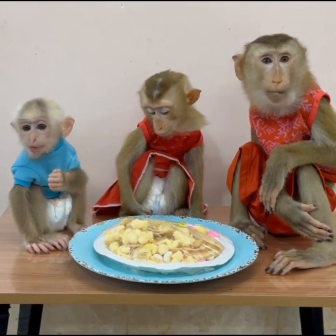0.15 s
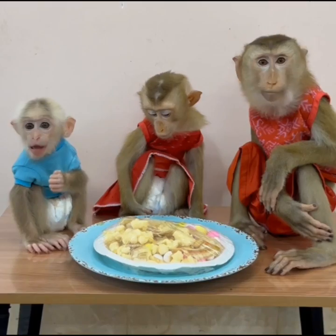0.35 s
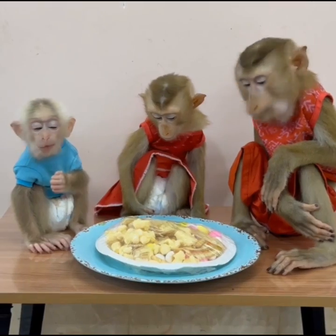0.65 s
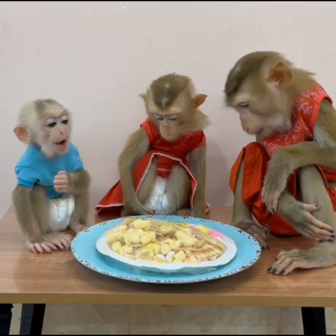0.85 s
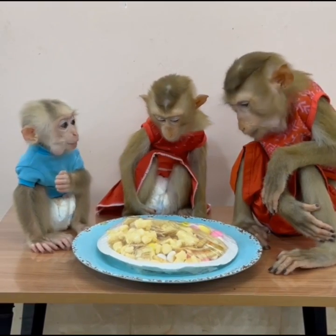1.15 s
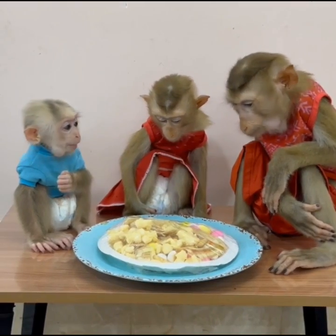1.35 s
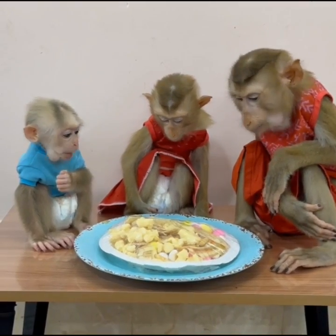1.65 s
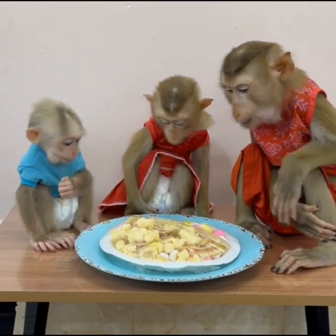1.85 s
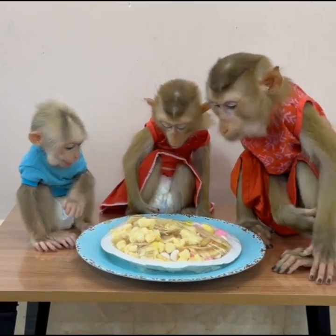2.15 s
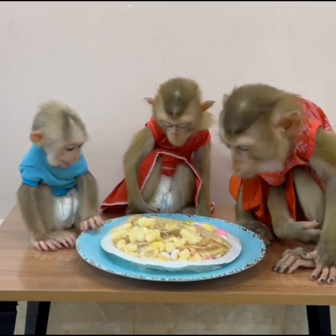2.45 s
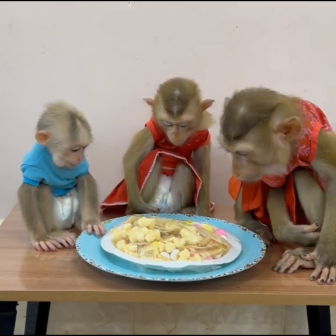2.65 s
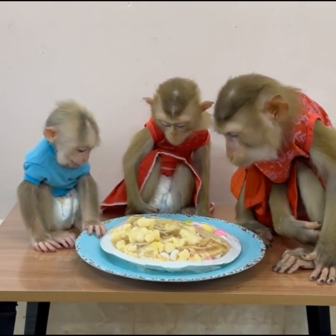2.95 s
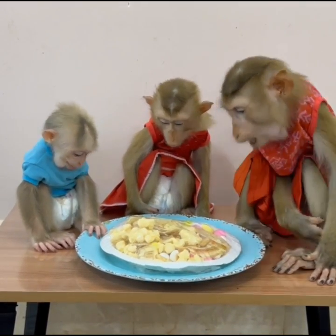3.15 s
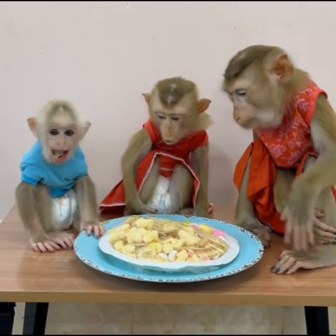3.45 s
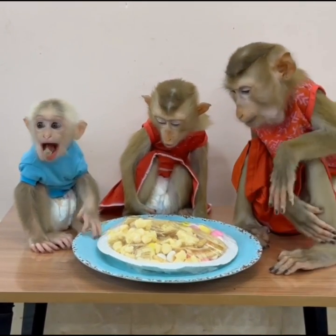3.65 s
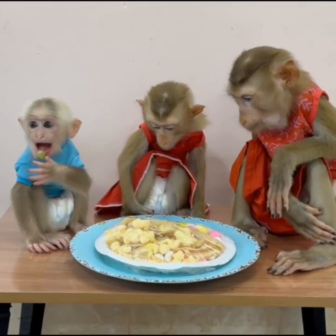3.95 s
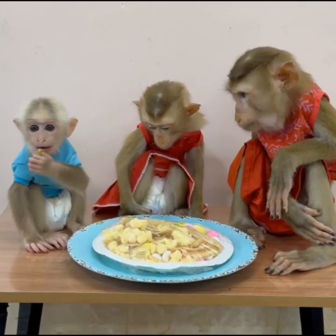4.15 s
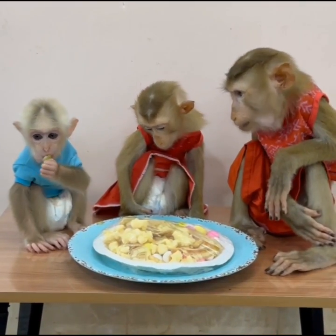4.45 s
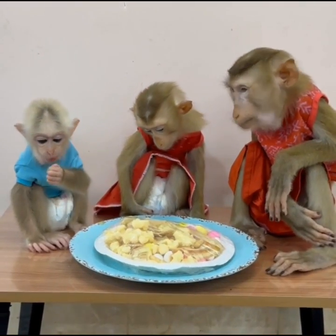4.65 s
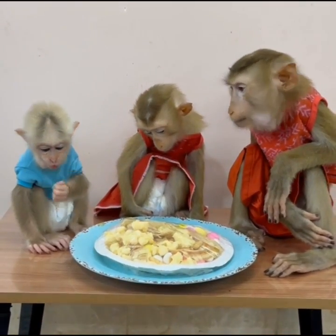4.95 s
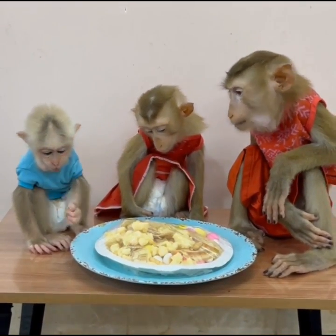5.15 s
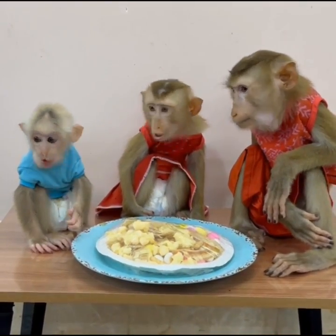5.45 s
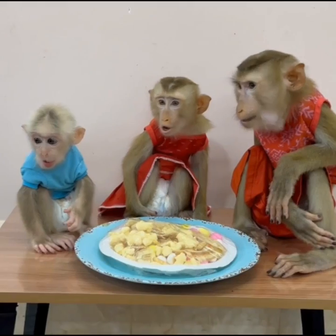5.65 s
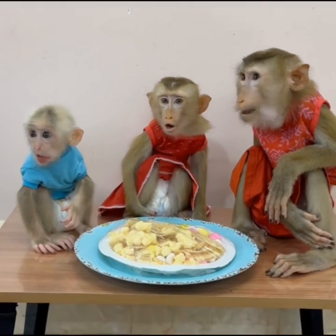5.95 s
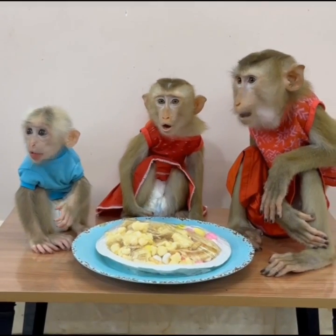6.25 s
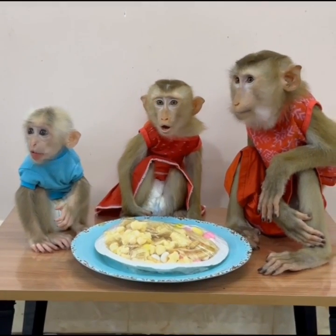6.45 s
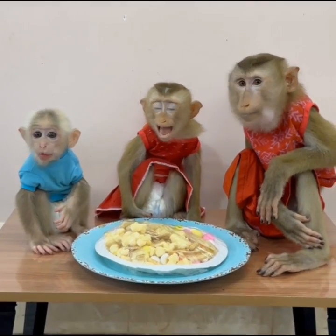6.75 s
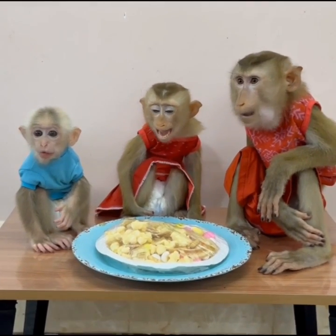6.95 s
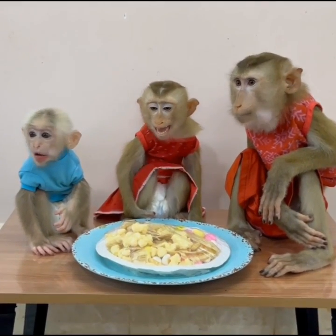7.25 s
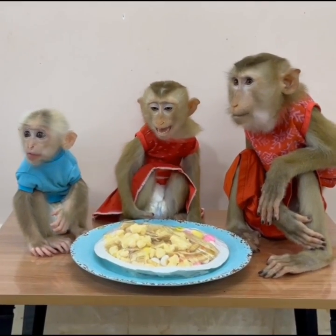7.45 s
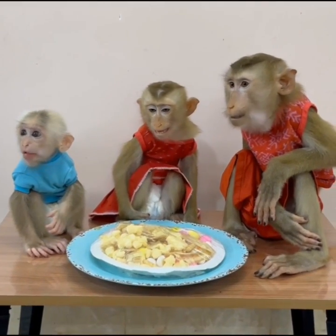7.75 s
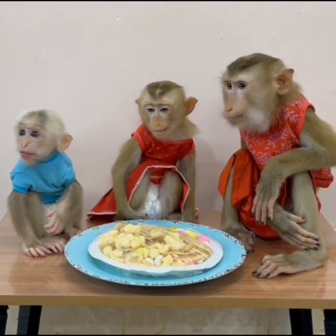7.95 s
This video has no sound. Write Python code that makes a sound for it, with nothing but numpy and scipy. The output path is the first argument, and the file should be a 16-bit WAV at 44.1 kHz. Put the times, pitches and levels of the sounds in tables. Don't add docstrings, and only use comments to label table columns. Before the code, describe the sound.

Small monkeys call at a table about a metre from a stereo phone microphone in a hard-walled room. A soft arched coo comes first, then dry scuffs, a hoarse wheezy chuckle and a rising whoop with a low thump. Two coos and two tiny high squeaks follow, then soft pats and three shakier coos. A yelp cracks into short, piercing, raspy screams with a small grunt. Quiet fan rumble, hum and hiss continue beneath.

```python
import sys
import numpy as np
from scipy import signal
from scipy.fft import rfft, irfft, next_fast_len
from scipy.io import wavfile
from scipy.ndimage import uniform_filter1d

SR = 44100
rng = np.random.default_rng(int(sys.argv[2]) if len(sys.argv) > 2 else 0)


def master_out(mix):
    frames = np.transpose(np.atleast_2d(mix))
    ceiling = np.clip(frames, -1, 1)
    pcm = np.round(ceiling * 32767).astype(np.int16)
    wavfile.write(sys.argv[1], SR, pcm)


def makeup_ratio(level_db):
    decades = np.asarray(level_db, float) / 20
    return 10 ** decades


N = 357651

# frequency in Hz, level in dB per Hz.
RASP = [(1000, -38.5), (1500, -7.5), (2100, -5), (3400, -2), (4100, -7.5), (5000, -4), (6600, -8),
        (8400, -2), (10500, 0), (11300, -14.5), (12200, -41)]
# frequency in Hz, level in dB.
FLAT = [(1000, 0), (12000, 0)]


def along(points, hz):
    f, v = np.transpose(points)
    return np.interp(np.log(np.maximum(hz, 1)), np.log(f), v)


def colour(x, points):
    size = next_fast_len(len(x), True)
    gain = makeup_ratio(along(points, np.fft.rfftfreq(size, 1 / SR)))
    return irfft(rfft(x, size) * gain, size)[:len(x)]


def unit(x):
    return x / np.sqrt(np.mean(x ** 2))


def noise(size):
    return rng.standard_normal(size // SR * SR + SR)


def wobble(size, rate):
    k = max(int(SR / rate), 2)
    smooth = uniform_filter1d(uniform_filter1d(noise(size), k), k)
    return unit(smooth)[:size]


def add(out, t, x):
    i = int(t * SR)
    out[i:i + len(x)] += x[:N - i]


def air():
    # frequency in Hz, level in dB per Hz.
    air_colour = [(25, -19), (40, -8), (55, 1), (100, 0), (160, -5.5), (500, -13.5), (2000, -19),
                  (3200, -30.5), (5000, -32), (8000, -34), (10500, -35.5), (12000, -62.5)]
    shared, differing = (unit(colour(rng.standard_normal(N), air_colour)) * makeup_ratio(-50) for _ in range(2))
    low = colour(shared, [(150, 8), (400, -18.5)])
    throb = low * (makeup_ratio(1.2 * wobble(N, 6)) - 1)
    hum_hz = 98.6 + 2.0 * wobble(N, 4.3)
    hum = makeup_ratio(-56.5 + 5.8 * wobble(N, 15)) * np.sin(2 * np.pi * np.cumsum(hum_hz) / SR)
    differing = colour(differing, [(30, -8), (120, -11), (330, -5), (700, -2), (1500, 2)])
    return shared + throb + hum, differing


def voice(rows, tract, jitter, shimmer_db, edge_s, fall=0., rasp_colour=RASP):
    s, hz, db, bright, *rasp = np.transpose(rows)
    t = np.arange(s[0], s[-1], 1 / SR)
    hz, db, bright = (np.interp(t, s, c) for c in (hz, db, bright))
    hz = hz * (1 + jitter * wobble(len(t), 220))
    slack = fall * np.clip(1 - (s[-1] - t) / .04, 0, 1) ** 2
    hz = hz * (1 - slack)
    bright = bright - 80.0 * slack
    turn = 2 * np.pi * np.cumsum(hz) / SR
    x = np.zeros(len(t))
    for k in range(1, 19):
        throat_db = along(tract, k * hz) - along(tract, hz)
        gain_db = db + throat_db + bright * np.log2(k) + shimmer_db * wobble(len(t), 39.1)
        tone = np.sin(k * turn + rng.uniform(0, 2 * np.pi))
        x += np.sqrt(2) * makeup_ratio(gain_db) * (k * hz < 12500) * tone
    if rasp:
        hiss = unit(colour(noise(len(t))[:len(t)], rasp_colour))
        x += makeup_ratio(np.interp(t, s, rasp[0])) * hiss * makeup_ratio(1.7 * wobble(len(t), 300))
    edges = np.clip(np.minimum(t - s[0], s[-1] - t) / edge_s, 0, 1)
    out = np.zeros(N)
    add(out, s[0], x * edges)
    return out


def coo(curve, db, loudest_s, bright):
    s, hz = np.transpose(curve)
    t = np.linspace(0, s[-1] - s[0], num=120)
    hz = uniform_filter1d(np.interp(t, s - s[0], hz), size=7, mode="nearest")
    catch_db = -25 * np.exp(-t / 0.0027)
    swell = np.clip(1 - t / loudest_s, 0, 1)
    fade = np.clip((t - loudest_s) / (t[-1] - loudest_s), 0, 1)
    db = db + catch_db - 8 * swell - 10 * fade ** 3.24
    bright = bright - 9.6 * np.exp(-t / 0.017)
    return np.transpose([s[0] + t, hz, db, bright])


def coos():
    # time in seconds, pitch in Hz.
    arches = [
        [(0.135, 670), (0.203, 718), (0.27, 764.3), (0.369, 759.5), (0.457, 716), (0.49, 669)],
        [(3.13, 774.5), (3.18, 816), (3.342, 828.6), (3.385, 810), (3.415, 782), (3.46, 760)],
        [(3.615, 669), (3.661, 803), (3.685, 795.7), (3.715, 775.6), (3.79, 769.2), (3.82, 724)],
        [(5.15, 802), (5.225, 753), (5.28, 797.5), (5.385, 809.4), (5.43, 788), (5.55, 756)],
        [(5.71, 680), (5.752, 747), (5.83, 753), (5.86, 773.6), (5.895, 762), (5.95, 718)],
        [(6.125, 685), (6.17, 716), (6.225, 769), (6.29, 773.6), (6.35, 732), (6.39, 723)],
    ]
    # level of the lowest tone in dB, loudest after seconds,
    # brightness in dB per octave.
    breaths = [
        (-33, .13, .8),
        (-28.5, .05, 1),
        (-31.5, .05, 3.3),
        (-29.5, .24, .8),
        (-34.5, .07, 3.6),
        (-35.5, .08, 4),
    ]
    # frequency in Hz, level in dB.
    young_throat = [(300, -29), (800, 5.5), (1550, -17), (2400, -12), (3100, -18.5), (3900, -27.5),
                    (5000, -42.5), (6000, -18.5), (6700, -29.5), (8100, -24), (9500, -47), (12000, -40.5)]
    older_throat = [(300, -36), (800, 9), (1550, -10), (2400, -7.5), (3100, -18), (3900, -26), (5000, -38),
                    (6000, -17), (7100, -31.5), (8100, -21), (9500, -57), (12000, -44)]
    notes = [coo(arch, *breath) for arch, breath in zip(arches, breaths)]
    out = np.zeros(N)
    for note in notes[:3]:
        out += voice(note, young_throat, jitter=0.0012, shimmer_db=1.0, edge_s=0.01, fall=0.19)
    for note in notes[3:]:
        out += voice(note, older_throat, jitter=0.004, shimmer_db=3.0, edge_s=0.0026, fall=.13)
    return out


def scuffs():
    # start in seconds, peak level in dB.
    scuff_times = [(1.3515, -51), (1.6006, -46.5), (2.6384, -62), (2.7028, -38), (2.7341, -46),
                   (2.878, -55.5), (3.028, -58)]
    out, t = np.zeros(N), np.arange(4000) / SR
    for s, db in scuff_times:
        grit = colour(rng.standard_normal(len(t)), [(800, -6.5), (3000, 0), (9000, -3.0)])
        add(out, s, makeup_ratio(db - 5.0) * unit(grit) * np.minimum(t / 0.0028, 1) * np.exp(-t / 0.023))
    return out


def chuckle():
    # frequency in Hz, width in Hz, level in dB.
    resonances = [(1400, 230, 4.5), (2490, 374, -3.5), (3270, 500, -18)]
    t = np.arange(0, .215, 1 / SR)
    db = -48.5 + 4 * np.exp(-((t - 0.048) / 0.021) ** 2)
    slaps = noise(len(t))[:len(t)] * makeup_ratio(1.8 * wobble(len(t), 70))
    x = np.zeros(len(t))
    for hz, width, gain_db in resonances:
        ring = signal.filtfilt(*signal.iirpeak(hz, hz / width, SR), slaps)
        x += makeup_ratio(gain_db) * ring * np.sqrt(250 / width)
    out = np.zeros(N)
    add(out, 1.585, unit(x) * makeup_ratio(db) * np.minimum((t[-1] - t) / .02, 1))
    return out


def whoops():
    # time in seconds, pitch in Hz, level of the lowest tone in dB, brightness in dB per octave.
    whoop, yelp = [
        [(1.765, 727, -42, 2), (1.781, 756.5, -38, 7), (1.837, 853, -28.5, 6.5), (1.909, 907, -28, 9),
         (1.997, 997, -25.5, 7), (2.053, 1104, -36, 10), (2.097, 1427, -30.5, -8), (2.11, 1500, -27, -38)],
        [(6.635, 760, -50, 1), (6.643, 791, -39, 2), (6.671, 870, -33.5, 2.5), (6.701, 957, -39, 11),
         (6.73, 914, -41.5, 5)],
    ]
    # frequency in Hz, level in dB.
    whoop_throat = [(300, 18), (900, 18), (1400, -22.5), (1900, -20), (2800, -23.5), (3700, -28.5),
                    (5000, -48), (6500, -37.5), (8500, -49), (10500, -43), (12000, -54.5)]
    yelp_throat = [(900, 3), (1800, -6), (2800, -18), (3700, -20), (5000, -39), (6200, -28.5),
                   (8300, -37.5), (10000, -52), (12000, -57)]
    out = voice(whoop, whoop_throat, jitter=0.0017, shimmer_db=5.0, edge_s=0.0072)
    return out + voice(yelp, yelp_throat, jitter=0.0029, shimmer_db=6.0, edge_s=0.0026)


def pats():
    # start in seconds, peak level in dB, table pitch in Hz.
    pat_times = [(1.929, -33, 56.5), (4.704, -41, 83.4), (4.865, -48, 99.6), (4.996, -35, 83.4),
                 (5.02, -57, 83.4)]
    out, t = np.zeros(N), np.arange(4000) / SR
    for s, db, hz in pat_times:
        add(out, s, makeup_ratio(db) * np.sin(2 * np.pi * hz * t) * np.exp(-t / 0.015))
    return out


def shrill(curve, break_s, rasp_db, growth_db_s, bright):
    s, hz, db = np.transpose(curve)
    t = np.linspace(s[0], s[-1], num=120)
    hz, db = np.interp(t, s, hz), np.interp(t, s, db)
    growth = growth_db_s * np.maximum(break_s - t, 0)
    dying = 1102 * np.maximum(t - break_s, 0)
    bright = bright - 0.32 * (db + 15)
    return np.transpose([t, hz, db, bright, rasp_db - growth - dying])


def squeaks():
    # time in seconds, pitch in Hz, level of the lowest tone in dB.
    squeak_curves = [
        [(3.645, 4900, -43), (3.65, 5576, -24.5), (3.665, 5510, -25), (3.682, 5500, -47)],
        [(3.996, 4800, -57), (4.0, 5168, -30.5), (4.026, 5227, -31.5), (4.038, 4990, -19.5), (4.06, 4580, -31)],
    ]
    # time of the click in seconds, its
    # level in dB, rise towards it in dB per second, brightness in dB per octave.
    squeak_breaks = [(3.648, -48, 97, -23.5), (3.996, -49, 111, -18)]
    return sum(voice(shrill(curve, *snap), FLAT, jitter=0.00073, shimmer_db=-2.5, edge_s=0.0038)
               for curve, snap in zip(squeak_curves, squeak_breaks))


def voice_crack():
    # time in seconds, pitch in Hz, level of the lowest tone in dB.
    crack_curve = [(6.7, 3000, -44), (6.728, 1550, -40), (6.752, 2250, -40), (6.785, 1700, -49)]
    # frequency in Hz, rasp level in dB per Hz.
    crack_rasp = [(1000, -35), (1600, 6), (2300, -2.5), (3200, -19), (5000, -10.5), (6500, -12.5),
                  (8200, -3), (10000, -10.5), (12000, -15)]
    rows = shrill(crack_curve, break_s=6.752, rasp_db=-28, growth_db_s=350, bright=-19)
    return voice(rows, FLAT, jitter=.07, shimmer_db=4.0, edge_s=.004, rasp_colour=crack_rasp)


def screams():
    # time in seconds, pitch in Hz, level of the lowest tone in dB.
    scream_curves = [
        [(6.78, 2120, -41), (6.8, 4000, -46.5), (6.815, 3800, -48), (6.83, 3294, -20), (6.842, 3600, -32),
         (6.849, 3160, -9.5), (6.862, 2050, -38)],
        [(7.072, 2850, -25), (7.076, 3278, -4), (7.081, 3734, -19), (7.098, 3250, -18), (7.115, 3350, -52),
         (7.135, 3600, -25), (7.155, 3500, -27), (7.168, 3100, -9), (7.185, 1900, -36)],
        [(7.387, 3043, -45), (7.392, 2917, -30.5), (7.409, 2720, -30.5), (7.414, 2814, -39)],
        [(7.412, 3900, -34), (7.417, 3600, -20), (7.423, 3300, -36)],
    ]
    # time in seconds, rasp level in dB,
    # rasp growth in dB per second, brightness in dB per octave.
    scream_breaks = [(6.849, -21, 298, -11.5), (7.175, -20, 620, -4), (7.416, -10, 1517, 4.5),
                     (7.415, -17, 3500, -3.5)]
    # frequency in Hz, level in dB.
    open_mouth = [(1200, 0), (3300, 6.5), (5000, -1), (6800, 2), (8300, 3), (10000, -0.5), (12000, -12)]
    return sum(voice(shrill(curve, *tear), open_mouth, jitter=0.019, shimmer_db=-0.5, edge_s=0.00018)
               for curve, tear in zip(scream_curves, scream_breaks))


def grunt():
    # time in seconds, pitch in Hz.
    grunt_pitch = [(7.34, 516), (7.426, 427), (7.46, 411), (7.5, 337)]
    # frequency in Hz, level in dB.
    grunt_throat = [(300, 12.5), (480, -1.5), (850, 1), (1200, -39), (3000, -62)]
    rows = coo(grunt_pitch, db=-41, loudest_s=0.025, bright=0.0059)
    return voice(rows, grunt_throat, jitter=0.046, shimmer_db=4.0, edge_s=0.0044, fall=0.28)


def room(x):
    # frequency in Hz, level in dB.
    echo_colour = [(300, -2.5), (1000, -5.5), (2200, -3), (4000, -6.5), (8000, -2.5), (12000, -8)]
    t = np.arange(SR) / SR
    onset = np.clip((t - .003) / .008, 0, 1)
    tails = []
    for _ in range(2):
        slow, fast = (unit(rng.standard_normal(SR) * onset * makeup_ratio(-60 * t / t60)) / np.sqrt(SR)
                      for t60 in (.72, .58))
        tail = colour(slow, [(1800, 0), (3600, -20)]) + colour(fast, [(1200, -20), (2600, 0)])
        tails.append(signal.fftconvolve(x, colour(tail, echo_colour))[:N])
    return tails


def hush(bed, calls):
    treble = [(.7 * 3700, -30), (3700, 0)]
    power = uniform_filter1d(colour(calls, treble) ** 2, int(.05 * SR))
    return bed - colour(bed, treble) * power / (power + makeup_ratio(2 * -50))


def scene():
    monkeys = coos() + whoops() + squeaks() + voice_crack() + screams() + grunt()
    near = makeup_ratio(-1.0) * monkeys + chuckle() + scuffs() + pats()
    wet, wet_side = room(near)
    bed, bed_side = air()
    side = colour(wet_side * makeup_ratio(-1.5) + bed_side * makeup_ratio(-3.5), [(2020, 0), (2020, -22)])
    mid = near + wet + hush(bed, near + wet)
    return np.array([mid + side, mid - side])


def roll_off(x):
    return signal.sosfilt(signal.butter(12, 11600, fs=SR, output="sos"), x)


def record(dry):
    # frequency in Hz, how far right lags left in whole turns.
    twist = [(2000, 0), (3100, .12), (4300, 0), (5100, .06), (6300, .08), (6900, .1), (7400, .5),
             (8000, .9), (8600, 1), (9300, .83), (10000, .66), (10700, .5), (11300, .46), (12000, .3)]
    size = next_fast_len(N, True)
    half = np.exp(1j * np.pi * along(twist, np.fft.rfftfreq(size, 1 / SR)))
    x = irfft(rfft(dry, size) * np.array([half, half.conj()]), size)[:, :N]
    return roll_off(x)


dry = scene()
out = record(dry)
master_out(out)
```